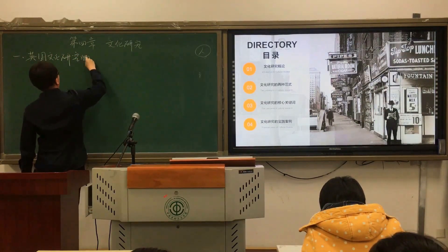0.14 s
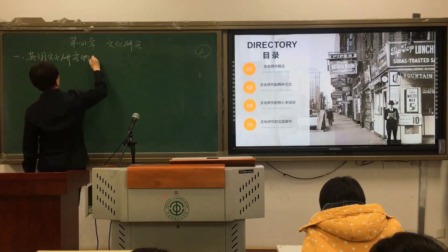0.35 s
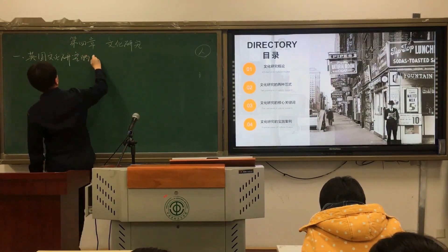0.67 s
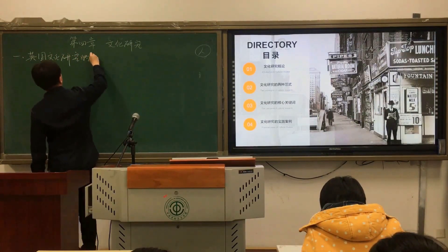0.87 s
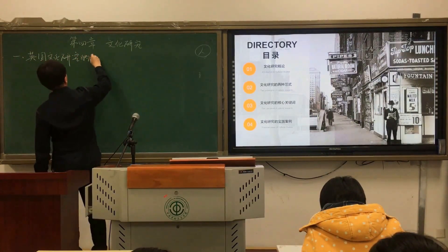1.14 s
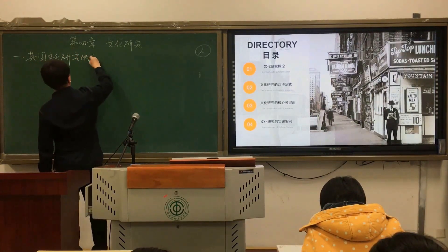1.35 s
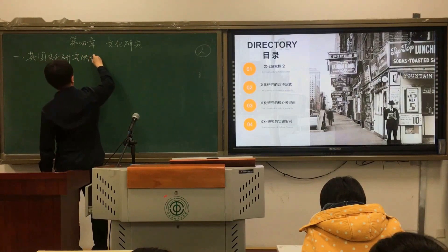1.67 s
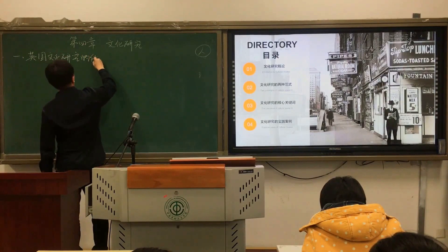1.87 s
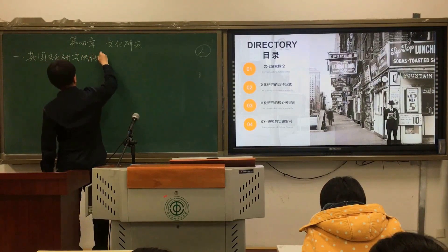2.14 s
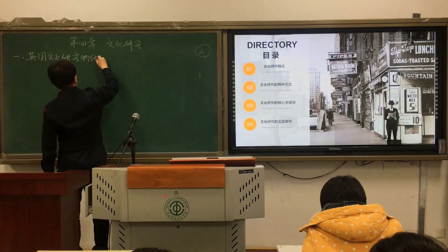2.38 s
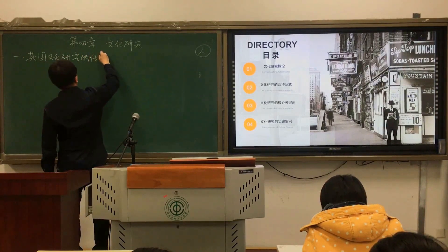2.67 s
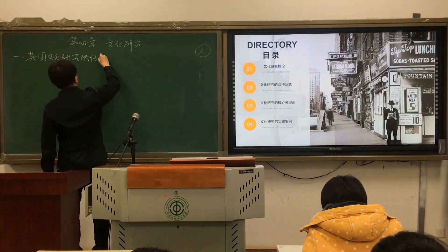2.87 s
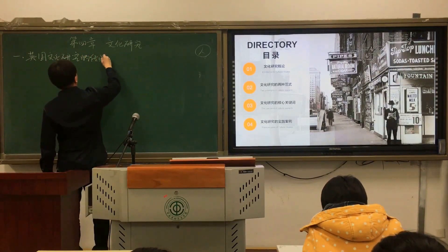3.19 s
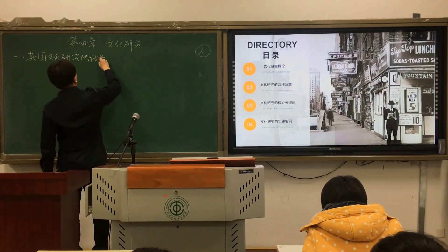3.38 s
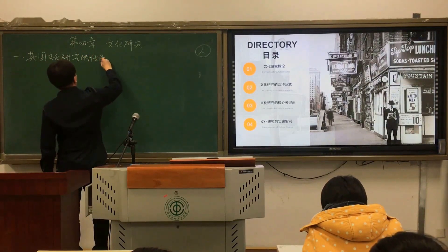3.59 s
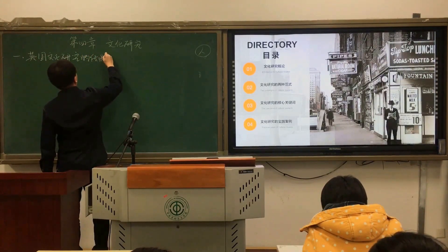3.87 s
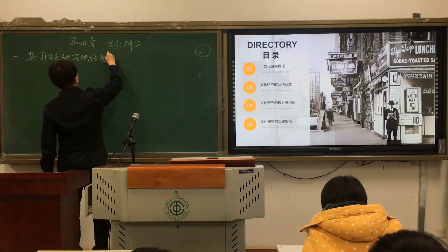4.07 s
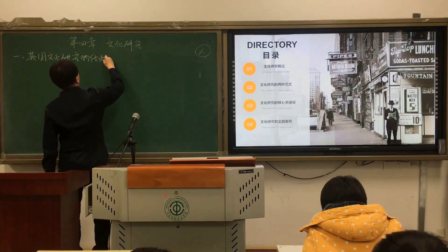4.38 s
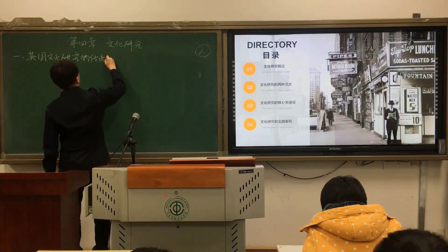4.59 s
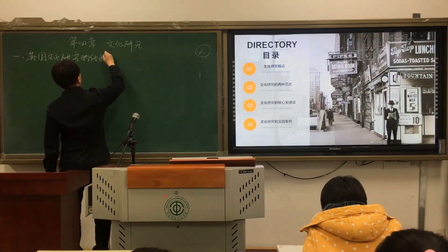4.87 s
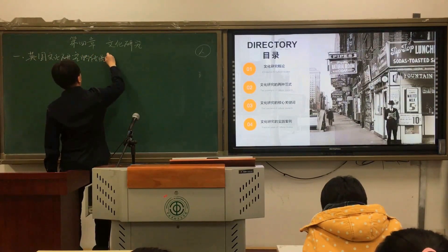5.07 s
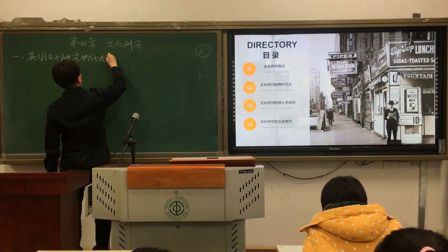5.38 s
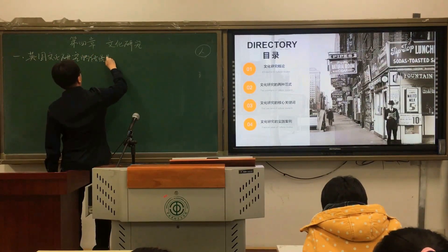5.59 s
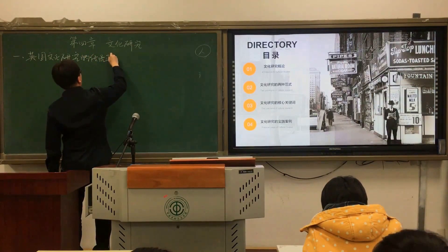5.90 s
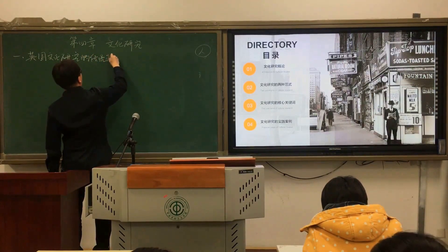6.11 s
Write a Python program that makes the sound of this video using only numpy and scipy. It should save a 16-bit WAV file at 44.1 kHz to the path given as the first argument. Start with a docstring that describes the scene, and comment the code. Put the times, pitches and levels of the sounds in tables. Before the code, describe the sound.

Hard chalk taps of handwriting on a board, spaced then quickening, faint scrapes between them, over soft room hush and wavering machine hum.

```python
"""Chalk writes on a wall blackboard in a quiet room with a low rumble and wavering machine hums.
Soft strokes and landings lead to a hard knock near 0.4 s with two tiny squeaks; a short shuffle follows.
Then more knocks come, with faint strokes between them, down to two last light strokes.
Landings are damped board modes plus a tip tick, with echoes and room tails; strokes are dense clicks
shaped into hiss and scrape; shuffle, hush and rumble are coloured noise, and the hums are sines."""
import sys
import numpy as np
from scipy import signal
from scipy.fft import rfft, irfft, next_fast_len
from scipy.io import wavfile
from scipy.ndimage import uniform_filter1d

SR = 44100
rng = np.random.default_rng(int(sys.argv[2]) if len(sys.argv) > 2 else 0)


def put_to_file(sound):
    """Save the sound as 16-bit audio at rate SR, in the file named by the first command-line argument."""
    columns = np.atleast_2d(sound).T  # one column per channel
    safe = np.clip(columns, -1, 1)
    whole_steps = np.round(safe * 32767)
    wavfile.write(sys.argv[1], SR, whole_steps.astype(np.int16))


N = 275184

# chalk contacts, hard landings and light touches: (time [s], tip tick [dB], board knock [dB],
# extra for the upper board modes [dB], contact time [ms]); the contact time then dulls the knock
LANDINGS = [(.045, -69, -40.5, 12.5, 0.48), (0.201, -55, -62, 4, 0.055), (.335, -59, -33.5, -2, 0.9),
            (0.412, -27, -20.5, 7.5, 0.16), (0.9943, -36, -18, 2.5, 0.095), (1.292, -66, -43, 5, 0.31),
            (1.372, -26.5, -20, 2.5, 0.067), (1.511, -52, -38, 1, 0.16), (1.727, -66, -39, -6, 0.25),
            (2.3255, -17.5, -13.5, 2.5, 0.085), (2.4322, -38.5, -34.5, 8, 0.13),
            (2.5045, -50.5, -68, -6, 0.05), (2.552, -50.5, -69, -3, .06), (2.8597, -21, -16.5, 1, 0.051),
            (2.9555, -48.5, -52, 7, 0.068), (3.4836, -21, -18.5, 2, 0.028), (3.640, -46, -56, 13, 0.074),
            (3.692, -26, -19, 3.5, 0.15), (4.1764, -16, -14, -0.5, 0.045), (4.4418, -25.5, -23, 2.5, 0.064),
            (5.1384, -16, -17, 1.5, 0.044), (5.327, -26, -24, 1.5, 0.066), (5.645, -27, -22.5, 4.5, 0.1),
            (5.839, -63, -43.5, -11, 0.21), (5.9392, -24, -18.5, 0.5, 0.075), (6.033, -52, -50, -7, 0.37),
            (6.0756, -24, -21.5, 1, 0.041)]
# ringing modes of the board: (frequency [Hz], level against the knock [dB], t60 [s], first swing [+1 or -1])
BOARD_MODES = [(131, -24.5, 0.1, -1), (169, -28, .13, -1), (254.8, -12, 0.12, -1), (262, -27, 0.24, -1),
               (362, 5, 0.0066, -1), (326.2, -9, 0.13, 1), (337.4, -29.5, 0.42, 1), (432, -12.5, 0.066, 1),
               (459.1, -15.5, 0.2, 1), (517, -4, 0.033, 1), (582, -19, 0.072, -1), (650.7, -17.5, 0.031, 1),
               (706, -19, 0.03, 1), (754, -17.5, 0.038, -1), (864, -17.5, 0.024, 1), (880, -3, 0.0053, 1),
               (1004, -16.5, 0.031, -1), (1095, -13, 0.022, 1), (1207, -17, 0.013, 1),
               (1368, -15.5, 0.035, -1), (1455, -15, 0.026, 1), (2077, -16, 0.02, 1), (2210, -24, 0.02, -1),
               (2430, -3.5, 0.0015, 1)]
UPPER_HZ = 650  # modes above this vary most from landing to landing
# colour of the tip tick: (frequency [Hz], relative density [dB per Hz])
TIP_COLOUR = [(1000, -4), (1800, 2.5), (2700, 5), (4000, 2), (5500, -2.5), (7800, -8), (9800, -16.5),
              (12500, -20), (15000, -26), (16000, -43), (22000, -36)]
CRUMB_DECAY_S = 0.0052  # crumbs of chalk follow the tick and die with this time constant

# strokes of the chalk along the board: (start [s], length [s], fine hiss [dB], coarse scrape [dB])
STROKE_LIST = [(.025, 0.075, -75, -70), (0.122, 0.072, -70.5, -69), (0.185, 0.12, -73.5, -71.5),
               (0.32, 0.041, -86, -71), (0.416, 0.047, -68, -66), (1.033, 0.08, -73.5, -67),
               (1.134, 0.067, -78, -74), (1.19, 0.062, -77, -70.5), (1.557, 0.1, -72.5, -69),
               (1.686, 0.096, -80, -76), (1.8, 0.096, -80, -80), (1.92, .06, -77, -74),
               (2.01, .055, -80, -76), (2.102, 0.1, -80, -73), (2.564, .06, -80, -77),
               (2.63, .06, -81, -82), (2.715, 0.033, -75, -66), (2.97, 0.084, -79, -72),
               (3.083, .045, -77, -77), (3.17, 0.058, -78, -72), (3.265, 0.08, -73, -71.5),
               (3.34, .07, -81, -74), (3.77, 0.094, -77, -69.5), (4.345, 0.033, -86, -70),
               (4.55, .03, -79, -87), (5.46, .045, -76, -73), (5.695, 0.11, -75, -71),
               (6.117, 0.063, -76, -74), (6.191, 0.094, -75.5, -69.5)]
STROKE_EDGE_S = 0.018  # a stroke swells and fades within this time
# colour of the fine hiss: (frequency [Hz], relative density [dB per Hz])
HISS_COLOUR = [(3530, -35), (6000, -13), (6940, -8.5), (7980, -9.5), (9760, -16), (12000, -9), (15100, -14),
               (15700, -28)]
# colour of the coarse scrape and of the ticks' treble tail: (frequency [Hz], relative density [dB per Hz])
SCRAPE_COLOUR = [(300, -40), (1000, 15), (2500, 7.5), (4500, 6), (7500, -3.5), (9500, -55), (12000, -29)]
TICK_TAIL_DB, TICK_TAIL_PEAK_S = -45.5, 0.047  # treble room tail: level against the tick, time to its top
# chalk squeaks just after a hard landing: (time [s], level, about 1 below the envelope's top [dB],
# frequency [Hz])
SQUEAK_LIST = [(0.4215, -43, 12150), (0.4247, -45, 12900)]

# reflections from near surfaces: (delay [s], level [dB])
NEAR_ECHOES = [(.0069, -12.5), (0.00199, -16.5), (0.012, -22), (0.031, -28.5)]
ECHO_HZ = 2530  # the near surfaces scatter what lies above this
# decay of the room: (frequency [Hz], t60 [s])
ROOM_DECAY = [(120, 0.65), (260, 0.52), (450, 0.57), (800, 0.37), (2000, 0.29), (5000, 0.17), (12000, 0.27)]
ROOM_KNOCK_DB, ROOM_UPPER_DB = -13.5, -9  # tail level for the lower modes, for upper modes and ticks

# colour of the shuffle: (frequency [Hz], relative density [dB per Hz])
SHUFFLE_TONE = [(250, 6), (600, 10.5), (1200, 7), (2000, -5.5), (3800, -8.5), (5000, -38), (8000, -45)]
SHUFFLE_S, SHUFFLE_DB, SHUFFLE_RISE_S, SHUFFLE_FADE_DB_PER_S = .709, -51, 0.003, 94

# colours of the room hush and the low rumble: (frequency [Hz], relative density [dB per Hz])
HUSH_COLOUR = [(24, -52), (45, -3), (65, 9.5), (100, -23), (160, -12.5), (210, -14), (290, -9.5),
               (500, -8.5), (900, -17), (1500, -23.5), (2300, -28), (4000, -32), (8000, -38),
               (15700, -42.5)]
RUMBLE_COLOUR = [(60, -39), (100, -22), (130, 3), (165, 5), (200, -16.5), (260, -32)]
HUSH_DB = -61  # rms ahead of the bass cut
# swells of the rumble: (time [s], level ahead of the bass cut [dB])
RUMBLE_LEVEL = [(0, -75), (.35, -59.5), (.9, -68.5), (1.15, -61), (1.5, -68.5), (2.1, -67.5), (2.45, -66.5),
                (3.2, -59.5), (3.9, -68.5), (4.3, -54), (4.6, -65), (4.93, -57.5), (5.2, -66),
                (5.75, -59.5), (6.24, -63)]
# machine hums: (frequency [Hz], middle of the wavering level [dB])
HUM_LIST = [(166.9, -71.5), (290.7, -74), (893.6, -75.5), (1653, -83), (2676, -92.5), (3090, -89)]
EDGE_HZ = 16400  # top of the recorded band


def chalk():
    """Each landing hits the damped board modes and ticks at the tip; upper parts alternate in three groups."""
    low, high = np.zeros(N), np.zeros((3, N))
    t = np.arange(SR // 2) / SR
    hz, db, t60, swing = np.transpose(BOARD_MODES)[:, :, None]
    upper = hz > UPPER_HZ
    is_upper = upper[:, 0]
    spots = rng.standard_normal((len(LANDINGS), 2, len(BOARD_MODES), 1))
    crumbs = rng.standard_normal((len(LANDINGS), 600))
    click = causal(TIP_COLOUR)
    tick_t = t[:600]
    for k, (s, tick_db, knock_db, upper_db, contact_ms) in enumerate(LANDINGS):
        # each spot drives the modes a little differently, the upper ones most
        spot_db = (.6 + 1.6 * upper) * spots[k, 0]
        spot_hz = hz * (1 + .025 * upper * spots[k, 1])
        decay_db = -60 * t / t60
        level = swing * gain_of(knock_db + db + upper_db * upper + spot_db + decay_db)
        ringing = level * np.sin(2 * np.pi * spot_hz * t)
        # a longer contact dulls the blow: two equal poles with the contact time as time constant
        r = np.exp(-1000 / (max(contact_ms, .01) * SR))
        modes = signal.lfilter([(1 - r) ** 2], [1, -2 * r, r ** 2], ringing)
        add(low, s, modes[~is_upper].sum(0))
        add(high[k % 3], s, modes[is_upper].sum(0))
        tick = (tick_t == 0) + .045 * crumbs[k] * np.exp(-tick_t / CRUMB_DECAY_S)
        add(high[k % 3], s, gain_of(tick_db) * np.convolve(tick, click))
    return low, high


def strokes_and_tick_tails():
    """Dense clicks hiss and scrape as breaking chalk and carry the ticks' tails; two brief sines squeak."""
    fine_level, coarse_level = noise_levels()
    fine = fine_level * evened(coloured(grit(per_s=18000, spread_db=-2.0), HISS_COLOUR))
    coarse = coarse_level * evened(coloured(grit(per_s=9000, spread_db=1.2), SCRAPE_COLOUR))
    squeak, t = np.zeros(N), np.arange(200) / SR
    for s, db, hz in SQUEAK_LIST:
        envelope = t / 0.00027 * np.exp(1 - t / .0003)
        add(squeak, s, gain_of(db) * np.sin(2 * np.pi * hz * t) * envelope)
    return fine + coarse + squeak


def noise_levels():
    """Strokes rise, hold and fall; each tick is followed by a swelling, dying treble room tail. Powers add."""
    fine_power, coarse_power = np.zeros((2, N))
    for s, length, hiss_db, scrape_db in STROKE_LIST:
        t = np.arange(0, length, 1 / SR)
        to_edge = np.minimum(t, length - t)
        power = np.sin(np.pi / 2 * np.minimum(to_edge / STROKE_EDGE_S, 1)) ** 2
        add(fine_power, s, gain_of(hiss_db) ** 2 * power)
        add(coarse_power, s, gain_of(scrape_db) ** 2 * power)
    t = np.arange(SR // 2) / SR / TICK_TAIL_PEAK_S
    for s, tick_db, *_ in LANDINGS:  # the treble tail shares the noise of the scrape
        add(coarse_power, s, (gain_of(tick_db + TICK_TAIL_DB) * t * np.exp(1 - t)) ** 2)
    return np.sqrt(fine_power), np.sqrt(coarse_power)


def grit(per_s, spread_db):
    """A dense random train of clicks of uneven size, like chalk grains breaking."""
    size = gain_of(spread_db * np.minimum(rng.exponential(1, N), 4))
    return size * rng.standard_normal(N) * (rng.random(N) < per_s / SR)


def room_tail():
    """Sparse reflections of random sign, one in every 20 samples, each band dying at its own speed."""
    taps = np.zeros(SR)
    at = np.arange(80, SR - 20, 20)
    taps[at + rng.integers(0, 20, len(at))] = rng.choice([-1., 1.], len(at))
    hz, t, z = signal.stft(taps, SR, nperseg=256)
    t60 = np.interp(hz, *np.transpose(ROOM_DECAY))
    tail = signal.istft(z * gain_of(-60 * t / t60[:, None]), SR, nperseg=256)[1]
    return tail / np.linalg.norm(tail)


def shuffle():
    """A brief rough noise somewhere in the room that starts almost at once and fades."""
    t = np.maximum(np.arange(N) / SR - SHUFFLE_S, 0)
    level = np.minimum(t / SHUFFLE_RISE_S, 1) * gain_of(SHUFFLE_DB - SHUFFLE_FADE_DB_PER_S * t)
    return noise(SHUFFLE_TONE, patchy_db=2.0) * level


def hush():
    """Room air and a swelling low rumble as coloured noise, with sine hums that waver in level."""
    t = np.arange(N) / SR
    steps = rng.standard_normal((len(HUM_LIST), N // 64 + 1))
    wavers = uniform_filter1d(steps, size=14, axis=1).repeat(64, axis=1)[:, :N]
    hums = np.zeros(N)
    for (hz, db), waver in zip(HUM_LIST, wavers):
        level = np.sqrt(2) * gain_of(db + 4.55 * evened(waver))  # root 2 turns rms into peak
        hums += level * np.sin(2 * np.pi * hz * t)
    rumble = noise(RUMBLE_COLOUR, patchy_db=3.5) * gain_of(curve(RUMBLE_LEVEL))
    air = noise(HUSH_COLOUR, patchy_db=1.5) * gain_of(HUSH_DB)
    return air + rumble + hums


def noise(points, patchy_db):
    """Coloured noise from random short-time spectra, with patches that drift in time and pitch."""
    frames, hz = N // 256 + 5, np.fft.rfftfreq(1024, 1 / SR)
    a, b, patches = rng.standard_normal((frames, 513, 3)).T
    patches = uniform_filter1d(patches, size=10, axis=0)
    patches = evened(uniform_filter1d(patches, size=12, axis=1))
    z = (a + 1j * b) * gain_of(read(points, hz)[:, None] + patchy_db * patches)
    return evened(signal.istft(z, nperseg=1024, noverlap=768)[1][:N])


def causal(points, size=1024):
    """A click of the given colour that starts at once (minimum phase), with its peak at 1."""
    hz = abs(np.fft.fftfreq(size, 1 / SR))
    log_gain = np.log(gain_of(np.maximum(read(points, hz), -45)))
    click = np.fft.ifft(np.exp(np.conj(signal.hilbert(log_gain)))).real[:size // 2]
    return click / abs(click).max()


def coloured(x, points):
    """Filters a sound by a spectrum."""
    size = next_fast_len(len(x))
    gain = gain_of(read(points, np.fft.rfftfreq(size, 1 / SR)))
    return irfft(rfft(x, size) * gain, size)[:len(x)]


def read(points, hz):
    """Reads a spectrum in dB on a log-frequency axis, -90 dB outside its ends."""
    f, value = np.transpose(points)
    return np.interp(np.log(hz + 1), np.log(f + 1), value, left=-90, right=-90)


def curve(rows):
    """Reads a curve at every sample."""
    return np.interp(np.arange(N) / SR, *np.transpose(rows))


def gain_of(db):
    """Turns decibels into a factor."""
    return 10 ** (np.asarray(db) / 20)


def evened(x):
    """Scales a sound to rms 1."""
    return x / np.sqrt(np.mean(x ** 2) + 1e-20)


def add(mix, s, sound):
    """Mixes a sound in at time s, in seconds."""
    part = mix[round(s * SR):][:len(sound)]
    part += sound[:len(part)]


def scene():
    """Landings with dulled near echoes and room tails, then strokes, shuffle and hush."""
    low, high = chalk()
    direct = low + high.sum(0)
    near = direct.copy()
    dull = signal.lfilter(*signal.butter(1, ECHO_HZ, fs=SR), direct)
    for delay_s, db in NEAR_ECHOES:
        add(near, delay_s, gain_of(db) * dull)
    wet = gain_of(ROOM_KNOCK_DB) * signal.fftconvolve(low, room_tail())[:N]
    for group in high:  # each group of upper modes and ticks has its own tail
        wet = wet + gain_of(ROOM_UPPER_DB) * signal.fftconvolve(group, room_tail())[:N]
    return (near + wet + strokes_and_tick_tails() + shuffle() + hush())[None]


def record(dry):
    """The microphone drops the deep bass; a steep low-pass then limits the band."""
    bass_cut = signal.butter(3, 55., "high", fs=SR, output="sos")
    thinned = signal.sosfilt(bass_cut, dry)
    band_limit = signal.firwin(511, EDGE_HZ, window=("kaiser", 9), fs=SR)
    return signal.oaconvolve(thinned, band_limit[None], "same")


dry = scene()
out = record(dry)
put_to_file(out)
```